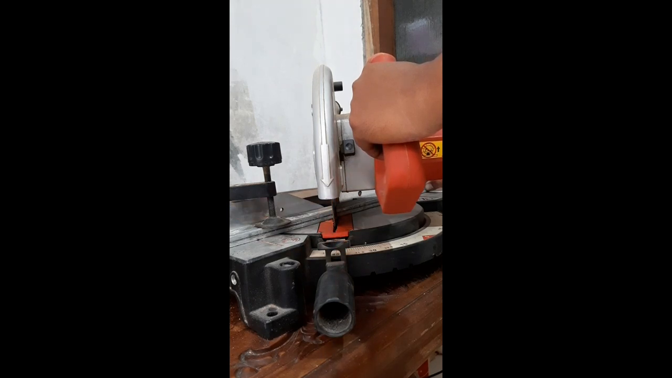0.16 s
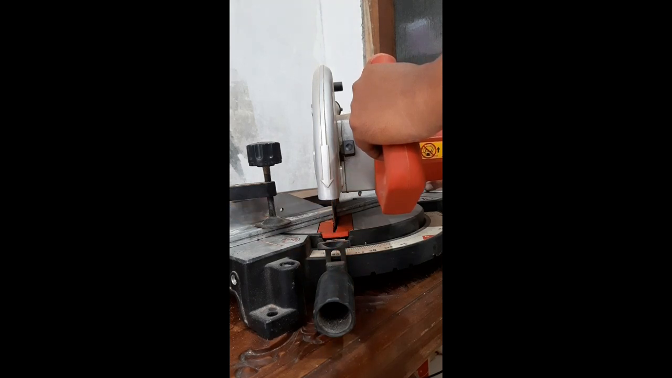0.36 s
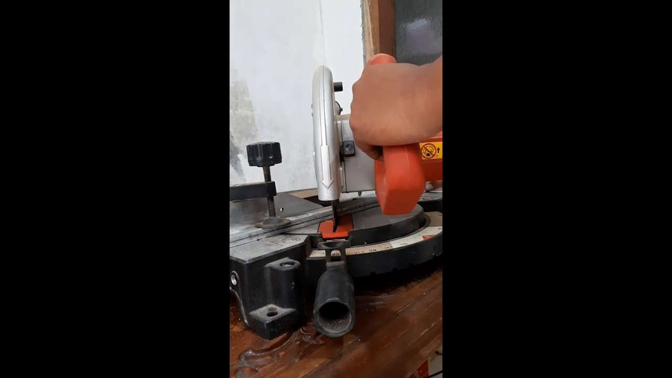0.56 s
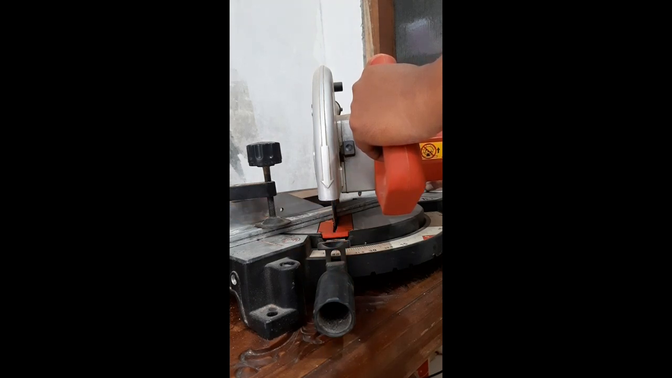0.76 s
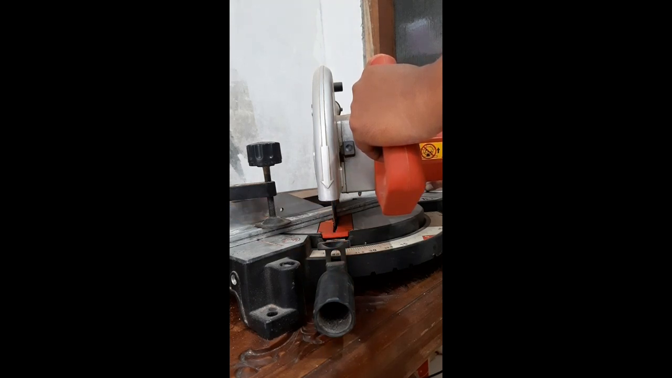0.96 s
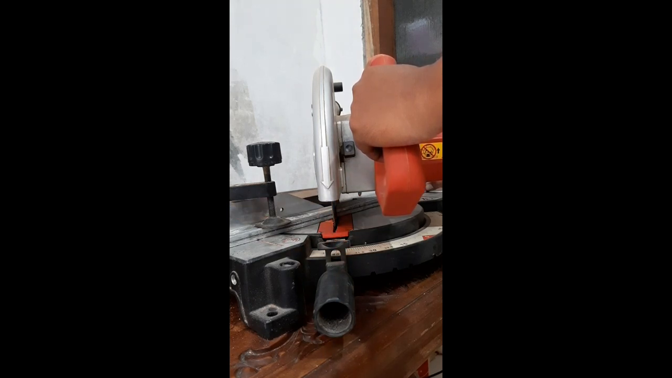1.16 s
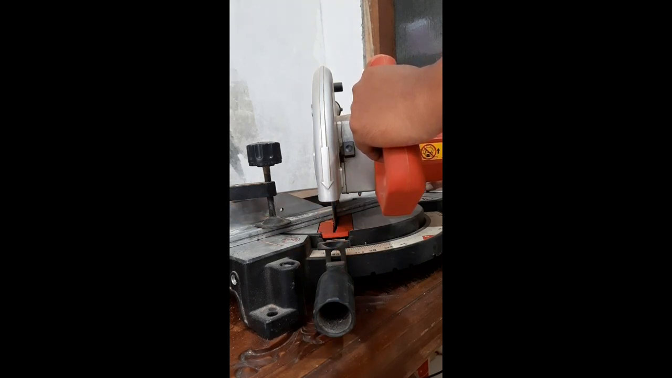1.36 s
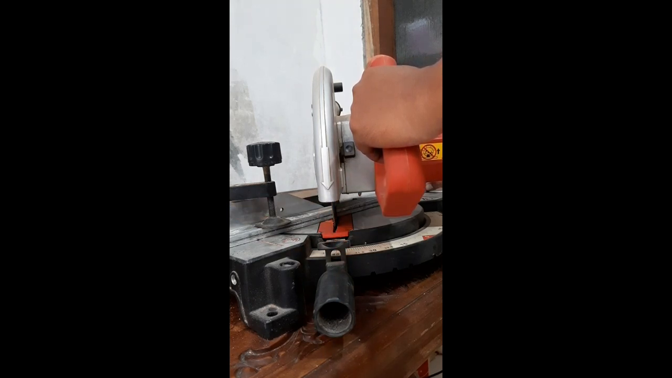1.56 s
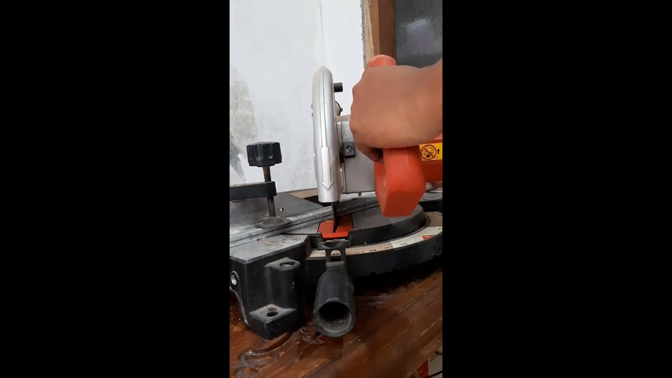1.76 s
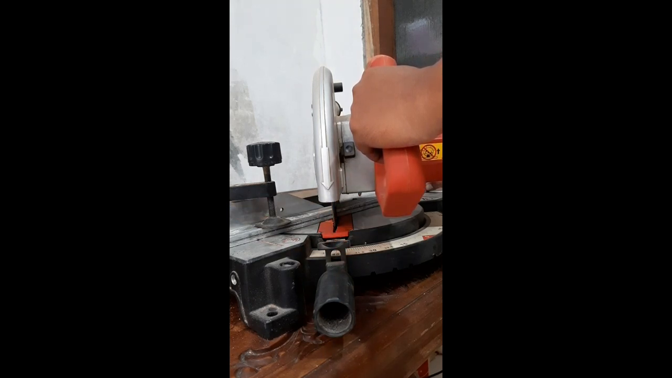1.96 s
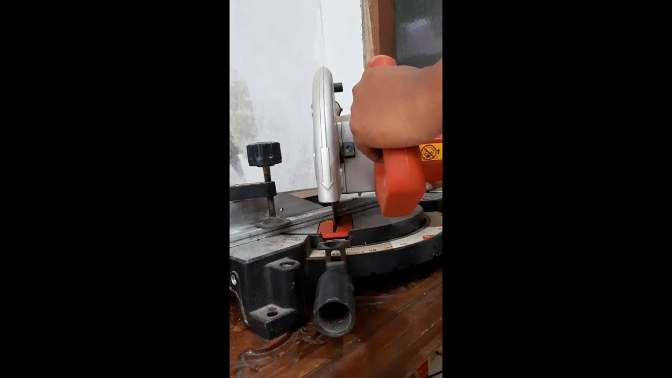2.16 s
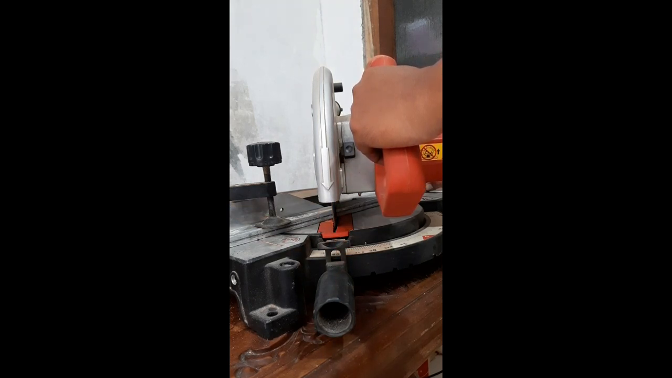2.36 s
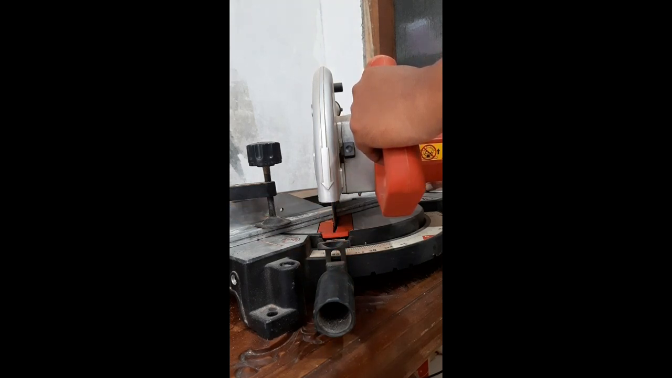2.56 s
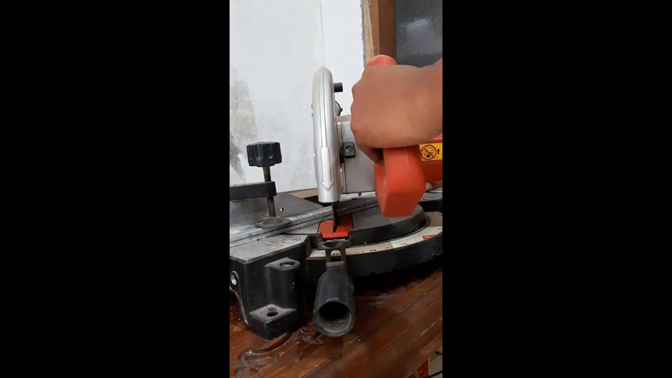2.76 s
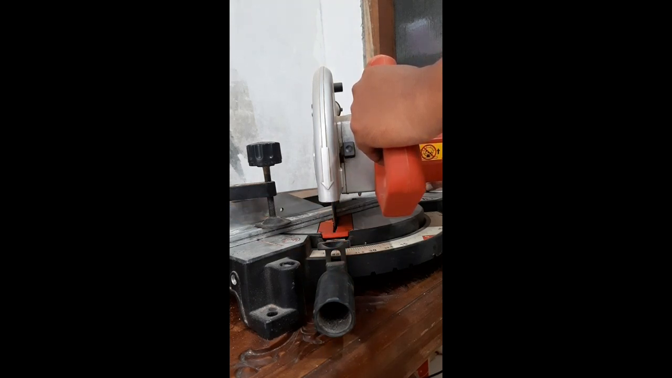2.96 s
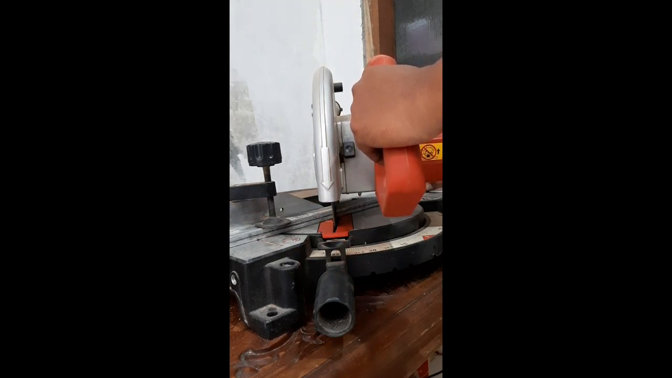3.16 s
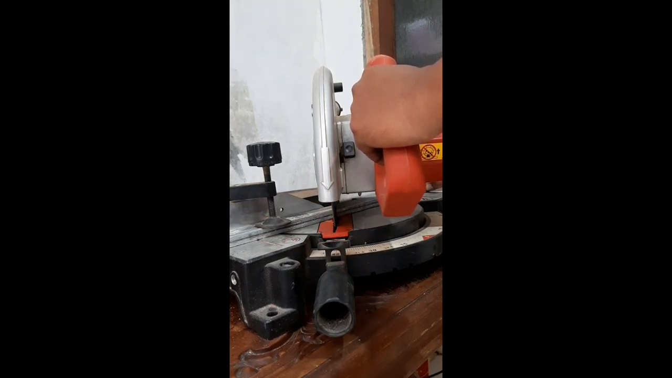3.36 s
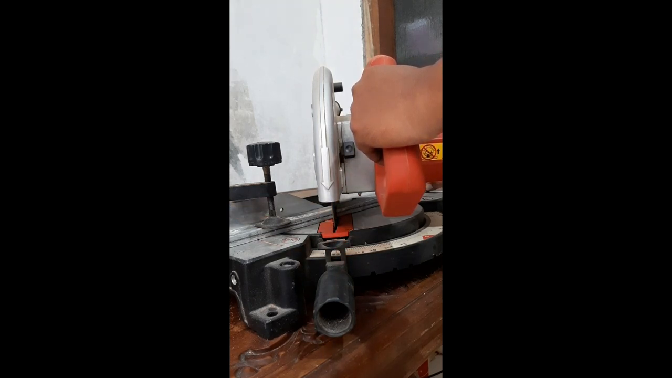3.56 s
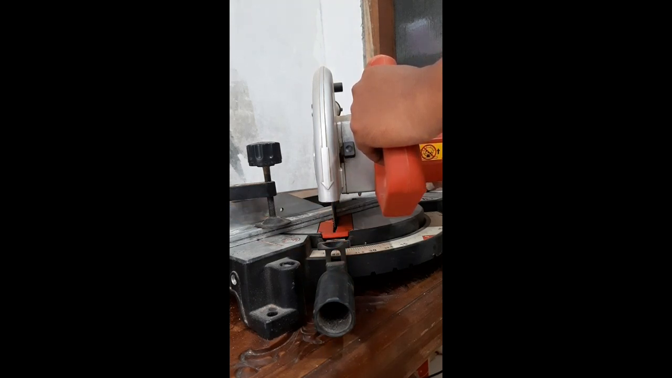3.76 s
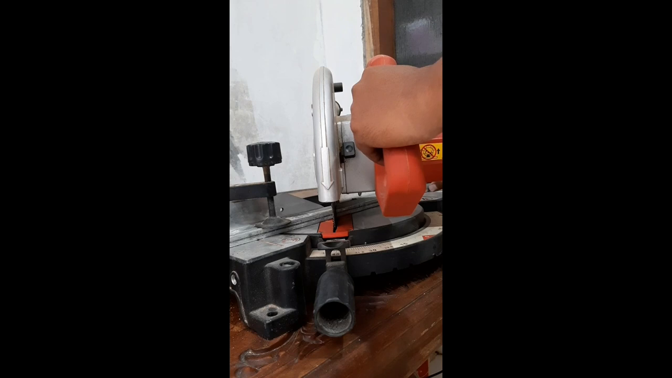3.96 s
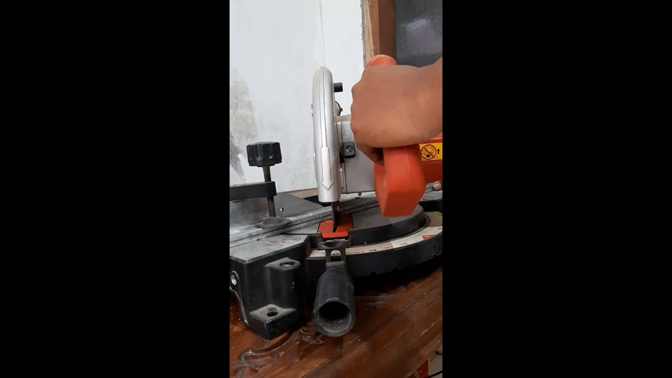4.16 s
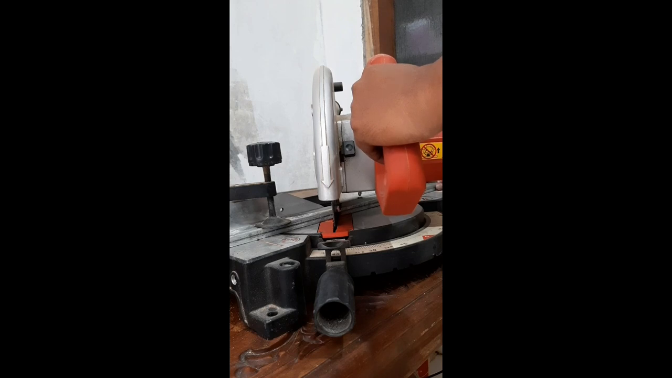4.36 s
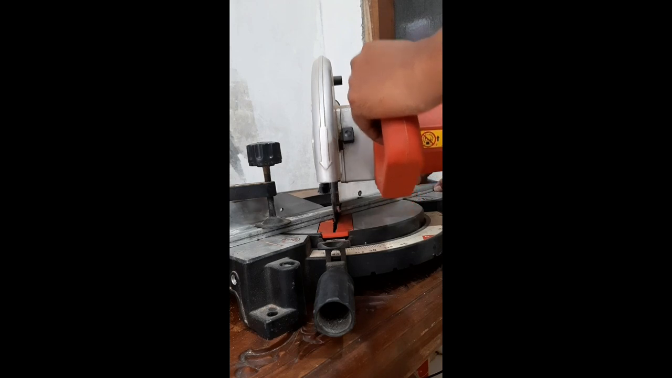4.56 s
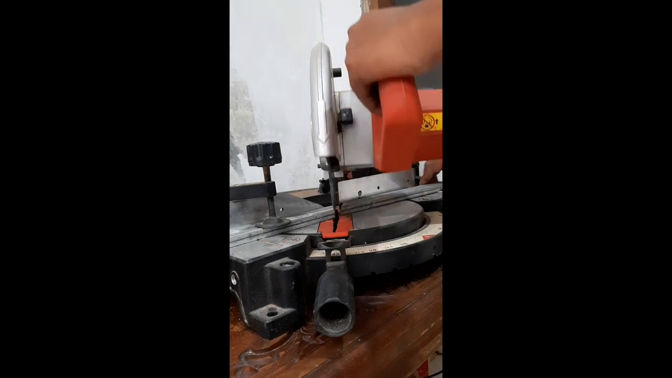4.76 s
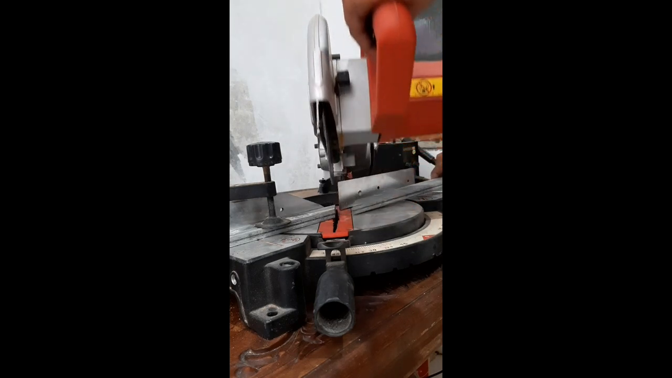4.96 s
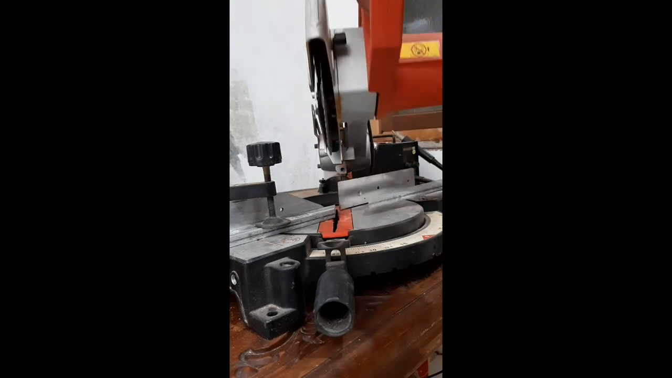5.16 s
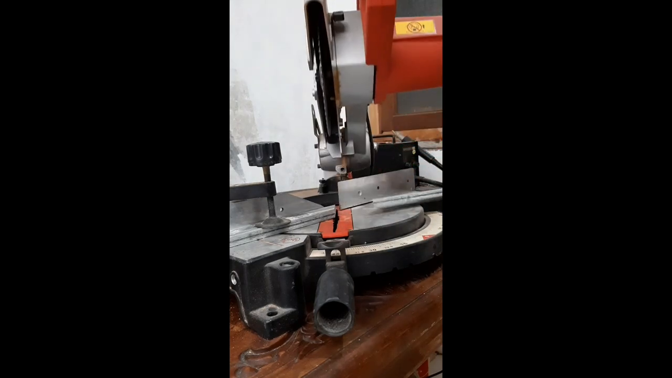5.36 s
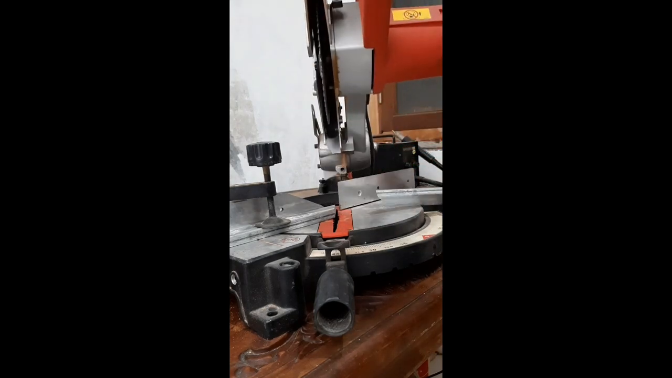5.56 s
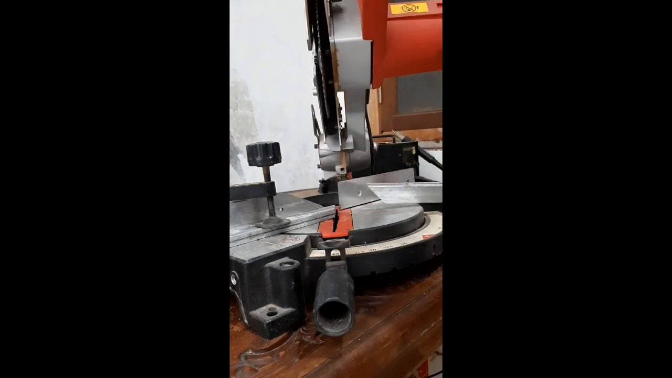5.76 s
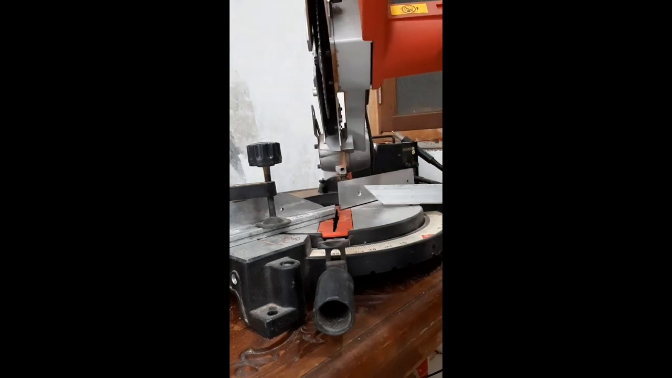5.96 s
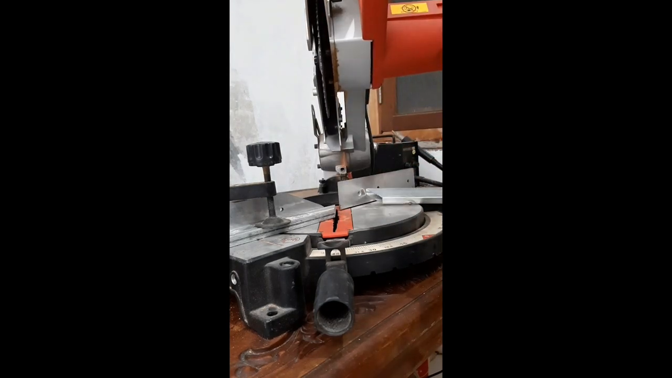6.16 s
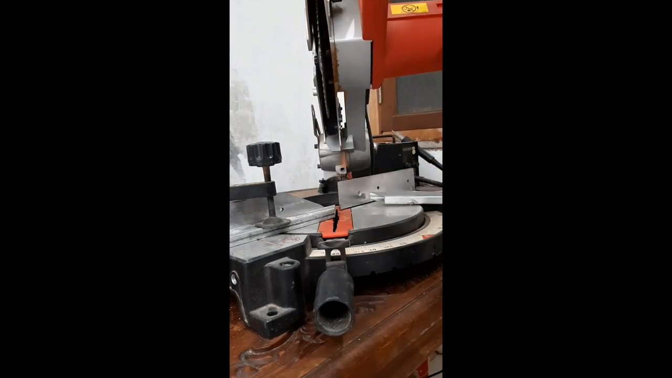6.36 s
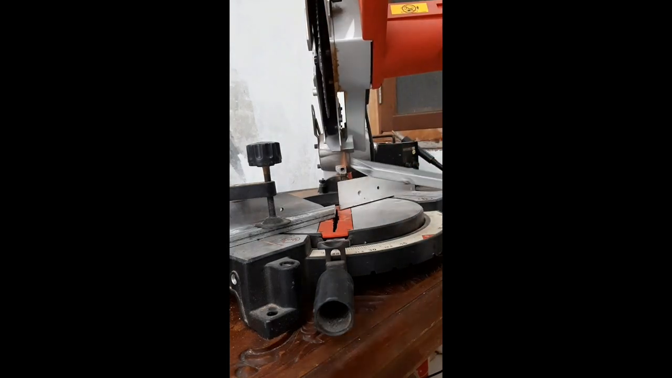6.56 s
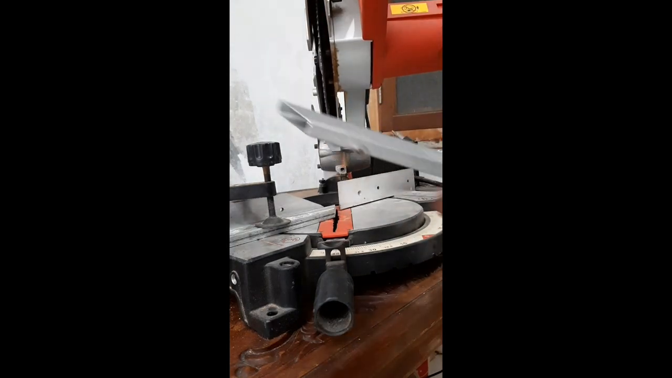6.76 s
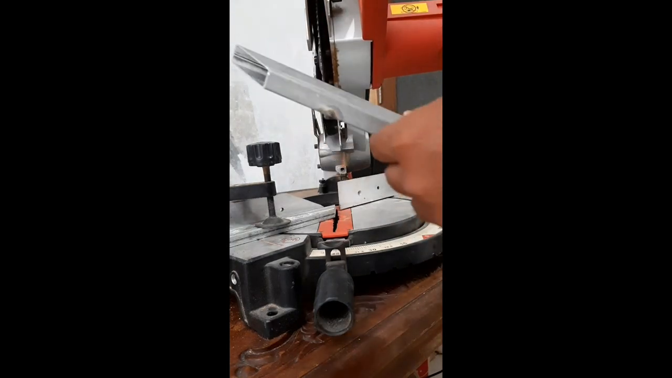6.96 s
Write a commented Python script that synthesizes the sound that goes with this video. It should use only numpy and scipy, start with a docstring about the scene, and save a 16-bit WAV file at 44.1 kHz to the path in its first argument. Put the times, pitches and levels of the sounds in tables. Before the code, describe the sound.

A miter saw grinds through steel with a harsh screech, winds down scraping and ringing, then the arm clunks up and the cut bar knocks.

```python
"""A miter saw grinds through a steel bar in a small hard room, heard from close by with a microphone pair. Chip
noise is shaped into gritty hiss and ringing steel; pings, whistles and a blade squeal are sine tones. The
slowing blade still rubs in the cut, noise ringing its free modes, until the rubbing dies and it rings out. Then
the arm is lifted against its stop, and the cut bar is knocked about and drawn off the table: blows are noise
cracks over dying modes, slides and drags are swelling noise, over a low room murmur."""
import sys
import numpy as np
from scipy import signal
from scipy.fft import rfft, irfft
from scipy.io import wavfile

SR = 44100
rng = np.random.default_rng(int(sys.argv[2]) if len(sys.argv) > 2 else 0)


def store_wav(level_fs):
    """Save 16-bit WAV to argv[1]."""
    pcm = np.round(np.clip(np.atleast_2d(level_fs), -1, 1) * 32767)
    wavfile.write(sys.argv[1], SR, pcm.T.astype(np.int16))


N = 309582
T = np.arange(N) / SR  # s
HZ = np.fft.rfftfreq(N, 1 / SR)


def amp(db):
    """Decibels to gain."""
    return 10 ** (np.asarray(db) / 20)


def unit(x):
    """Scales to rms 1."""
    return x / np.sqrt(np.mean(x ** 2) + 1e-20)


def curve(rows):
    """A two-column time table read at every sample."""
    rows = np.asarray(rows, float)
    return np.interp(T, rows[:, 0], rows[:, 1])


def read(points, hz):
    """A spectrum table read on a log-frequency axis."""
    f, value = np.transpose(points)
    return np.interp(np.log(hz + 1), np.log(f + 1), value)


def add(mix, s, sound):
    """Mixes a stereo sound in at time s."""
    part = mix[:, round(s * SR):][:, :sound.shape[1]]
    part += sound[:, :part.shape[1]]


def colour(x, gain):
    """Filters by a gain on HZ; rms 1."""
    return unit(irfft(rfft(x) * gain, N))


def wander(hz):
    """Chance drift up to about hz, in straight lines between random points; rms 1."""
    knots = np.arange(0, T[-1] + 1, .4 / hz)
    return unit(np.interp(T, knots, rng.standard_normal(N)[:len(knots)]))


def noise(size=N, shared=0.27):
    """White noise at two microphones, partly common to both."""
    z, shared = rng.standard_normal((3, size)), np.clip(shared, 0, 1)
    return np.sqrt(shared) * z[2] + np.sqrt(1 - shared) * z[:2]


def peaks(rows):
    """Power response of a set of resonances."""
    return sum(amp(db) ** 2 / (1 + ((HZ - hz) / (0.56 * width)) ** 2) ** 2 for hz, width, db in rows)


def swell(s, half):
    """A smooth bump of height 1 around time s."""
    return np.exp(-((T - s) / half) ** 2)


def stroke(start, end, attack=0.074, release=0.027):
    """Attack, hold and release of one movement, in seconds."""
    return np.clip((T - start) / attack, 0, 1) * np.exp(-np.maximum(T - end, 0) / release)


# decay of the small hard room: pitch_hz, t60_s
ROOM_DECAY = [(100, 0.7), (800, 0.85), (2000, 0.32), (5000, 0.24), (14000, 0.87)]


def room(x):
    """A diffuse tail at each microphone; every pitch range fades at its own rate."""
    hz, t, z = signal.stft(rng.standard_normal((2, SR)), SR, nperseg=256)
    fade = amp(-60 * t / read(ROOM_DECAY, hz)[:, None])
    tail = signal.istft(z * fade, SR, nperseg=256)[1]
    tail[:, :200] = 0  # the tail sets in after 4.5 ms
    return signal.fftconvolve(x, tail / np.linalg.norm(tail[0]), axes=1)[:, :N]


def reflections(x, wet_db, t60=0.044, count=120):
    """Table, guard and walls return the sound within 40 ms, combing each microphone differently."""
    taps = np.zeros((2, SR // 25))
    at = rng.integers(0, taps.shape[1], (2, count))
    strength = rng.choice([-1, 1], at.shape) * amp(-60 * at / SR / t60)
    np.put_along_axis(taps, at, strength, 1)
    taps /= np.linalg.norm(taps, axis=1, keepdims=True)
    echo = signal.oaconvolve(x, taps, axes=1)[:, :N]
    return (x + amp(wet_db) * echo) / np.sqrt(1 + amp(wet_db) ** 2)


# power off, running speed, time constant of the run-down
OFF_S, RUN_TURNS_PER_S, COAST_S = 2.55, 72, 0.57


def speed():
    """Blade speed as a share of its running speed."""
    return np.exp(-np.maximum(T - OFF_S, 0) / COAST_S)


def turning():
    """Blade angle in radians."""
    return 2 * np.pi * np.cumsum(RUN_TURNS_PER_S * speed()) / SR


FREE_S, FREE_WIDTH_S = 2.806, 0.069  # the blade comes free of the load


def free():
    """Share of the sound power that comes from the unloaded blade."""
    return .5 + .5 * np.tanh((T - FREE_S) / (2 * FREE_WIDTH_S))


# how hard the teeth bite as the hand feeds the blade: time_s, bite_db
BITE = [(0, -21), (.33, -25), (.56, -21), (.84, -22.5), (1.02, -27.5), (1.66, -25.5), (1.93, -21.5),
        (2.3, -22), (2.58, -21)]
ORDINARY_BITE_DB = -22.5


def extra_bite():
    """Bite in dB over an ordinary one."""
    return curve(BITE) - ORDINARY_BITE_DB


def grit(grain_db, chatter_db, runout_db):
    """Countless chips: uneven in size, clumped by chatter, the pressure cycling with each turn."""
    angle = turning()
    runout = np.sin(angle) + .7 * np.sin(3 * angle)
    pressure_db = grain_db * wander(1700) + chatter_db * wander(45) + runout_db * runout
    return reflections(noise(shared=0.43) * amp(pressure_db), wet_db=-9.0)


# spectrum of the grinding hiss: pitch_hz, density_db (per Hz)
GRIND_COLOUR = [(88, -63), (150, -43), (230, -23), (350, -20.5), (450, -16), (750, -11.5), (1100, -3.5),
                (2020, -6), (3200, -3), (4400, -5), (5300, -5.5), (5850, -9), (6800, -7), (7620, -9),
                (9080, -7), (14800, -9.5), (16000, -33)]
# spectrum of the shaking bench: pitch_hz, density_db (per Hz)
BENCH_COLOUR = [(25, -13.5), (60, -2), (110, 1), (210, -1.5), (400, -9.5), (1000, -66.5)]
# resonances of the bar and the loaded blade: pitch_hz, width_hz, level_db (relative)
LOADED_RESONANCES = [(1455, 40, -4), (1560, 40, -8), (2690, 25, -8), (3468, 16, -4), (3815, 24, -7),
                     (4001, 10, -4), (4275, 40, -7), (4462, 14, -5), (4628, 16, -4), (4993, 12, -3),
                     (5522, 12, -4), (6120, 18, -4), (6265, 18, -4), (7035, 40, -4), (7157, 25, -3.5),
                     (7290, 20, -9), (8000, 30, -4), (8560, 70, 1), (12257, 25, -8), (12450, 30, -5),
                     (13276, 16, -5)]
# the bench judders when the blade snags: time_s, half_length_s, level_db
BENCH_JUDDERS = [(.437, .012, -45), (0.558, .05, -56), (2.56, 0.17, -47)]
BODY_DB, BODY_FOLLOW = -23, .05  # the body hardly follows the bite (dB, dB per dB)
UNLOAD_DB_PER_S = 20  # the body drops after power off
BENCH_DB = -58  # steady shaking


def grinding():
    """The loaded blade tears at the steel; the bar rings and the bench shakes."""
    chips = grit(grain_db=1.0, chatter_db=1.31, runout_db=0.3)
    spectrum = amp(read(GRIND_COLOUR, HZ))
    treble = 1 / (1 + (4200 / (HZ + 1)) ** 4)
    bite = curve(BITE)
    unload_db = UNLOAD_DB_PER_S * np.maximum(T - OFF_S, 0)
    body_db = BODY_DB + BODY_FOLLOW * extra_bite() - unload_db
    hiss = colour(chips, spectrum * (1 - treble)) * amp(body_db)
    hiss += colour(chips, spectrum * treble) * amp(bite + 3.0)
    # as the contact shifts, groups of resonances swell and sink separately
    ring = np.zeros((2, N))
    for k in range(4):
        group = np.sqrt(peaks(LOADED_RESONANCES[k::4]))
        ring += colour(noise(shared=.25), group) * amp(2.2 * wander(9))
    jolt = amp(BENCH_DB) + sum(amp(db) * swell(s, half) for s, half, db in BENCH_JUDDERS)
    shake = colour(noise(shared=0.11), amp(read(BENCH_COLOUR, HZ))) * jolt * amp(2 * wander(15.0))
    return (hiss + ring * amp(bite - 7.5) + shake) * np.sqrt(1 - free())


PINGS_PER_S, PING_LOW_HZ, PING_HIGH_HZ = 260, 950, 5400
PING_S, PING_DB = .04, -28.5  # a ping peaks near PING_S / 2; level at an ordinary bite


def pings(spread_db=2.5, follow=0.35):
    """Chips tear off and ring briefly: a rasp of narrow, ever shifting partials."""
    out, t = np.zeros((2, N)), np.arange(0, 3 * PING_S, 1 / SR)
    shape = t / PING_S * np.exp(-2 * t / PING_S) * np.cos(np.pi / 2 * t / t[-1])
    for when, pitch, size, left, right in rng.random((round(PINGS_PER_S * FREE_S), 5)):
        hz = PING_LOW_HZ * (PING_HIGH_HZ / PING_LOW_HZ) ** pitch
        phase = np.array([[left], [left + right / 2]])  # in turns, one per microphone
        tone = np.sin(2 * np.pi * (hz * t + phase))
        add(out, when * FREE_S, amp(-spread_db * np.log(size + .05)) * shape * tone)
    level = np.sqrt(FREE_S / T[-1]) * amp(PING_DB + follow * extra_bite())
    return unit(out) * level * np.sqrt(1 - free())


# level of the singing bar before its trim: time_s, level_db
SING_LEVEL = [(0, -28), (.22, -24), (.37, -25), (.42, -42), (.52, -31), (.66, -25), (.86, -23.5),
              (1.0, -28), (1.1, -26), (1.2, -38), (1.36, -28.5), (1.7, -37), (2.3, -40)]
SING_START_HZ, SING_END_HZ, SING_SETTLE_S = 3705, 3832, .55


def singing(jitter_hz=8, flutter_db=1.3, trim_db=1.5):
    """One mode of the bar whistles on, climbing to a settled pitch as the cut deepens."""
    climb = (SING_START_HZ - SING_END_HZ) * np.exp(-T / SING_SETTLE_S)
    hz = SING_END_HZ + climb + jitter_hz * wander(90)
    turns = np.cumsum(hz) / SR + np.array([[0], [1 / 6]])
    level = amp(curve(SING_LEVEL) + trim_db + flutter_db * wander(30))
    return np.sin(2 * np.pi * turns) * level * (1 - free())


# friction makes one resonance sing: start_s, end_s, pitch_hz, level_db (before the trim)
WHISTLES = [(.0, .06, 4993, -32), (.09, .17, 4993, -30), (.05, .18, 5515, -29), (.08, .25, 7157, -31),
            (.37, .45, 4985, -31), (.38, .51, 5535, -30), (.49, .6, 4015, -31), (.49, .58, 3890, -31),
            (.56, .63, 5522, -30), (.55, .8, 7035, -30), (1.06, 1.13, 4001, -31), (1.12, 1.4, 4993, -35),
            (1.8, 1.93, 4001, -30), (1.81, 1.92, 7157, -32), (1.97, 2.04, 6275, -31),
            (2.14, 2.22, 6265, -31), (2.14, 2.3, 4001, -26), (2.33, 2.52, 4001, -29.5),
            (2.36, 2.55, 5530, -33), (2.46, 2.56, 4993, -29), (2.587, 2.613, 7200, -22),
            (3.02, 3.12, 5717, -31), (3.33, 3.41, 2835, -32)]


def screeches(jitter_hz=22, flutter_db=2, trim_db=5.0):
    """Brief unsteady whistles of steel caught by friction."""
    out, drift = np.zeros((2, N)), wander(80)
    flutter = amp(trim_db + flutter_db * wander(32))
    for start, end, hz, db in WHISTLES:
        span = slice(round(start * SR), round(end * SR))
        turns = np.cumsum(hz + jitter_hz * drift[span]) / SR + 0.2 * rng.random((2, 1))
        fade = signal.windows.tukey(turns.shape[1], .5)
        add(out, start, np.sin(2 * np.pi * turns) * amp(db) * flutter[span] * fade)
    return out + amp(-9) * room(out)


SQUEAL_DB, SQUEAL_FOLLOW = -17, 1  # before the room mix, at an ordinary bite (dB, dB per dB of bite)
SQUEAL_REST_HZ, SQUEAL_STIFFEN_HZ = 7740, 590  # spin stiffens the mode, by the square of the speed


def squeal(jitter_hz=38, burst_db=5, drift_hz=18):
    """One blade mode locks onto the friction in short bursts, louder with the bite, sinking with the speed."""
    hz = SQUEAL_REST_HZ + SQUEAL_STIFFEN_HZ * speed() ** 2
    hz += jitter_hz * wander(70) + drift_hz * wander(3.7)
    bursts = unit(amp(burst_db * np.tanh(wander(40)) * 1.5))
    level = amp(SQUEAL_DB + SQUEAL_FOLLOW * extra_bite()) * (1 - free())
    tone = np.sin(2 * np.pi * np.cumsum(hz) / SR) * bursts * level
    return 0.5 * tone + 0.5 * room(np.array([tone, tone]))


# low room murmur before its 5 dB lift: time_s, level_db
MURMUR_LEVEL = [(3.3, -75.5), (4.15, -82.5), (4.6, -75.5), (5.8, -70.5), (6.1, -65), (7.02, -63.5)]
# spectrum of the murmur: pitch_hz, density_db (per Hz)
MURMUR_COLOUR = [(25, -24.5), (60, -15), (105, 4), (190, 0), (300, -8), (700, -20), (3000, -30.5)]
# spectrum of the steady air: pitch_hz, density_db (per Hz)
AIR_COLOUR = [(300, -15), (700, -8), (1300, 0), (2500, -5), (5000, -15.5), (10000, -22.5), (15500, -14.5)]
AIR_DB = -64


def room_noise():
    """A low murmur in the room, and faint steady air: two shaped noises."""
    murmur = colour(noise(), amp(read(MURMUR_COLOUR, HZ))) * amp(curve(MURMUR_LEVEL) + 5.0)
    return murmur + colour(noise(), amp(read(AIR_COLOUR, HZ))) * amp(AIR_DB)


# rubbing of the slowing blade: time_s, level_db (before trims)
RUB_LEVEL = [(2.55, -7.5), (2.75, -20), (3.15, -26), (3.5, -37.5), (3.72, -39), (3.9, -52.5), (4.08, -65.5)]
# treble of the rubbing, dulling late in the run-down: time_s, level_db (relative)
RUB_TREBLE_LEVEL = [(2.6, 1), (3.2, 2.5), (3.7, -5.5), (4.1, -10.5)]
# spectrum of the rubbing: pitch_hz, density_db (per Hz)
RUB_COLOUR = [(88, -70.5), (150, -24.5), (420, -21.5), (550, -13.5), (680, -16.5), (820, -7.5),
              (1500, -6.5), (2550, -6.5), (2810, -5), (3160, -10.5), (5250, -9), (6200, -20), (7180, -27.5),
              (7800, -16), (8560, -24.5), (11000, -10.5), (14000, -18.5), (16000, -30.5)]
# the wobbling blade catches the side of the cut: time_s, half_length_s, extra_db
SIDE_CATCHES = [(2.847, 0.014, 3), (2.968, 0.015, 2), (3.054, 0.01, 0), (3.154, 0.0098, -3),
                (3.194, 0.015, 2.5), (3.238, 0.017, 2.5), (3.395, 0.074, 7.5), (3.611, 0.066, 8),
                (3.878, 0.027, 2.5)]
# resonances of the free, turning blade: pitch_hz, width_hz, level_db (relative)
FREE_RESONANCES = [(1095, 80, 2.5), (1460, 60, 7), (1555, 80, 10.5), (1852, 50, 12), (2116, 40, 9),
                   (2304, 60, 10), (2825, 55, 11), (2910, 130, 7), (3400, 150, 2), (3720, 130, 7.5),
                   (3980, 140, 6), (4580, 170, 7), (4755, 90, 12), (5310, 90, 11), (5520, 80, 8),
                   (5717, 25, 11), (5975, 80, 10), (6660, 180, 12), (7020, 110, 16), (7590, 100, 10),
                   (7785, 120, 15.5), (7930, 80, 9), (8096, 40, 11), (8199, 40, 10), (8800, 200, 7),
                   (9330, 200, 7)]
# the blade at rest: pitch_hz, level_db (before REST_DB), t60_s
REST_RING = [(1104, -77, 2.2), (1857, -70, 1.5), (2288, -76, 1), (2627, -65, 2.2), (3666, -72, 1.6),
             (4657, -79, 1.2), (5071, -80, 2), (5647, -79, 1)]
RUB_STOP_DB_PER_S = 91  # dying away after the last contact
REST_S, REST_DB, REST_RISE_DB_PER_S = 3.93, 4, 78  # the free ring: time of its peak, lift, rise


def coasting(swell_db=4.5):
    """The slowing blade scrapes the side of the cut, ringing its free modes in turn, then rings out."""
    chips = grit(grain_db=1.5, chatter_db=0.95, runout_db=-0.17)
    treble = 1 / (1 + (6500 / (HZ + 1)) ** 8)
    spectrum = rfft(chips) * amp(read(RUB_COLOUR, HZ))
    scrape = .55 * irfft(spectrum, N)
    for k in range(3):
        group = np.sqrt(peaks(FREE_RESONANCES[k::3]))
        scrape += irfft(spectrum * group, N) * amp(swell_db * np.tanh(wander(17)))
    contact_db = curve(RUB_LEVEL) + sum(db * swell(s, half) for s, half, db in SIDE_CATCHES)
    contact_db -= RUB_STOP_DB_PER_S * np.maximum(T - RUB_LEVEL[-1][0], 0)
    rub = colour(scrape, 1 - treble) * amp(1.5)
    rub += colour(scrape, treble) * amp(curve(RUB_TREBLE_LEVEL))
    ring = np.zeros((2, N))
    for hz, db, t60 in REST_RING:
        level = amp(db + 2 * wander(30) - 60 * np.maximum(T - REST_S, 0) / t60)
        ring += level * np.sin(2 * np.pi * (hz * T + rng.random((2, 1)) / np.pi))
    rise = amp(REST_DB + REST_RISE_DB_PER_S * np.minimum(T - REST_S, 0))
    return rub * amp(contact_db) * np.sqrt(free()) + ring * rise


def ringing(modes, t, scatter=.4, flutter_hz=28):
    """Dying modes, each beating with a close partner and wavering differently at each microphone."""
    out, knots = np.zeros((2, len(t))), np.arange(0, t[-1] + 1, 1 / flutter_hz)
    for hz, db, t60 in modes:
        turn = np.exp(2j * np.pi * (hz * t + rng.random())) * amp(db - 60 * t / t60)
        turn *= .9 + .4 * np.exp(2j * np.pi * flutter_hz * rng.uniform(.4, 1.4) * t)  # the partner
        for side in out:
            z = rng.standard_normal((2, 200))[:, :len(knots)]
            echo = np.interp(t, knots, z[0] + 1j * z[1])
            side += (turn * (0.81 * np.exp(2j * rng.random()) + scatter * echo)).imag
    return out


# modes of the saw's frame: pitch_hz, level_db (relative), t60_s
FRAME = [(572, -14, 0.34), (785, -13, 0.26), (1130, 6, 0.079), (1266, -7, 0.24), (1327, 8, 0.059)]


def blows(rows, spectrum, modes, frame_db, attack_s, wet_db):
    """Each blow cracks, rattles the saw's frame and rings the struck steel; the room answers the rattle."""
    out, t = np.zeros((2, N)), np.arange(SR) / SR
    shape = amp(read(spectrum, np.fft.rfftfreq(SR, 1 / SR)))
    steel, frame = ringing(modes, t), ringing(FRAME, t)
    for s, db, t60, ring_db in rows:
        crack = unit(irfft(rfft(noise(size=SR, shared=0.84)) * shape, SR)) * amp(2.0 - 60 * t / t60)
        rattle = crack + amp(frame_db) * frame
        blow = rattle + amp(wet_db) * room(rattle)[:, :SR] + amp(ring_db) * steel
        add(out, s, amp(db) * blow * (1 - np.exp(-t / attack_s)))
    return out


# arm and guard clunk as they are lifted: time_s, level_db, t60_s, guard_ring_db (against the blow)
ARM_CLUNKS = [(4.267, -54.5, 0.17, -41), (4.3, -53.5, 0.11, -44), (4.32, -48, 0.17, -30),
              (4.341, -52, 0.24, -24), (4.736, -42, .04, -30), (4.742, -43.5, 0.033, -28.5),
              (4.767, -58.5, 0.068, -24.5), (4.838, -48.5, .04, -18), (4.851, -56, .05, -21),
              (4.926, -49.5, 0.019, -6.5), (5.01, -60, 0.087, -3), (5.087, -51.5, 0.041, -4)]
# spectrum of a clunk: pitch_hz, density_db (per Hz)
ARM_COLOUR = [(40, -23), (200, -31), (450, 9.5), (1200, 16.5), (3600, -4), (9000, -13), (15000, -27)]
# the loose guard rattles: pitch_hz, level_db (relative), t60_s
GUARD = [(2930, 0.5, 0.23), (3330, -8.5, 0.23), (4100, -0.5, 0.24), (4450, -5, .22), (4830, -6, 0.29)]


def clunks():
    """The arm clunks on its way up and rings the loose guard."""
    return blows(ARM_CLUNKS, ARM_COLOUR, GUARD, frame_db=-2.5, attack_s=0.002, wet_db=-4.5)


# guard and arm slide: start_s, end_s, body_db, hiss_db (before trims)
GUARD_SLIDES = [(4.3, 4.408, -59, -60.5), (4.408, 4.84, -65.5, -71), (4.776, 5.093, -60.5, -61.5),
                (5.044, 5.475, -63, -56.5), (5.482, 6.052, -58.5, -65)]
# spectrum of the slide's body: pitch_hz, density_db (per Hz)
SLIDE_BODY_COLOUR = [(200, -26), (450, -8), (800, -13), (1250, 9.5), (2200, 3), (4500, -4), (8000, -35)]
# spectrum of the slide's hiss: pitch_hz, density_db (per Hz)
SLIDE_HISS_COLOUR = [(600, -23), (2000, 7), (4500, 5), (7500, 4.5), (11000, 0.5), (15500, -4)]


def sliding():
    """The guard slides back as the arm rises: an uneven body and a steadier hiss of noise."""
    body_move = sum(amp(db) * stroke(start, end) for start, end, db, _ in GUARD_SLIDES)
    hiss_move = sum(amp(db) * stroke(start, end) for start, end, _, db in GUARD_SLIDES)
    body = colour(noise(), amp(read(SLIDE_BODY_COLOUR, HZ))) * body_move
    hiss = colour(noise(), amp(read(SLIDE_HISS_COLOUR, HZ))) * hiss_move
    return body * amp(-0.5 + 4.5 * np.tanh(wander(27))) + hiss * amp(-2.5 + 1.0 * wander(60))


# the arm hits its upper stop and rebounds: time_s, level_db, t60_s, blade_ring_db (against the blow)
STOP_HITS = [(5.506, -19.5, 0.072, -4), (5.519, -20, 0.023, -42)]
# spectrum of the hit: pitch_hz, density_db (per Hz)
STOP_HIT_COLOUR = [(40, -43), (200, -38), (450, -12), (800, -5.5), (1200, 6), (1700, 3.5), (2400, 2),
                   (3300, 17), (4200, 8), (9000, -3), (15000, -17)]
# modes of the struck blade: pitch_hz, level_db (relative), t60_s
STRUCK_BLADE = [(2853, -7, .68), (3100, -8, .36), (3350, -4.5, .38), (3773, -2, .58), (4457, -6, .4),
                (4778, -7, .48), (5130, -3, .36), (5455, -13, .25), (5733, -11, .3), (6090, -12, .25),
                (6540, -11, .2), (7461, -14, .36), (7765, -7, .27), (8345, -19, .36)]


def stop_hits():
    """The arm hits its upper stop, which rings the blade."""
    return blows(STOP_HITS, STOP_HIT_COLOUR, STRUCK_BLADE, frame_db=-19.0, attack_s=0.00054, wet_db=-2.5)


# modes of the cut bar lying against the saw: pitch_hz, level_db (relative), t60_s
CUT_BAR = [(732, -7, .6), (808, -4, .6), (1030, -1, .55), (1128, -3, .45), (1190, -4, .5), (1362, -2, .5),
           (1540, -6, .35), (1811, -6, .45), (2095, -9, .36), (2250, -8, .36), (2420, -8, .4),
           (2853, -10, .5), (3100, -4, .35), (3284, 0, .52), (3375, -1, .44), (3542, -5, .28),
           (3765, -6, .4), (4253, -8, .35), (4657, -8, .35), (4785, -7, .45), (6013, -19, .45),
           (7465, -21, .4), (7775, -18, .4)]
FAVOUR_DB, FAVOUR_HZ = 14.5, 130  # extra ring of the modes near the favoured pitch, and its reach


def bar_modes(favoured_hz):
    """The point of contact brings out some of the bar's modes."""
    modes = []
    for hz, db, t60 in CUT_BAR:
        favour = np.exp(-((hz - favoured_hz) / FAVOUR_HZ) ** 2)
        modes.append((hz, db + FAVOUR_DB * favour, t60))
    return modes


# the cut bar knocks on the table: time_s, level_db, t60_s, bar_ring_db (against the blow), favoured_hz
BAR_KNOCKS = [(6.009, -21, 0.055, -17.5, 2220), (6.02, -31, 0.081, -19, 1190),
              (6.051, -38, 0.12, -15.5, 3360), (6.094, -33.5, 0.038, -29, 1200),
              (6.139, -46, .1, -14, 1180), (6.322, -53, .04, -27, 1030), (6.399, -46, .11, -14, 2860),
              (6.411, -18.5, 0.089, -12, 2855), (6.426, -30, .06, -21, 1030), (6.444, -38, .034, -27, 3540)]
# spectrum of a knock: pitch_hz, density_db (per Hz)
BAR_KNOCK_COLOUR = [(40, -28), (200, -19), (450, -6), (600, -12), (1150, 6.5), (1900, 2), (2280, 5),
                    (2650, -9), (3700, -3), (4500, -4), (5400, -16), (9000, -26), (15000, -43)]


def bar_knocks():
    """The cut bar is knocked about, each contact ringing it differently."""
    out = np.zeros((2, N))
    for *row, hz in BAR_KNOCKS:
        out += blows([row], BAR_KNOCK_COLOUR, bar_modes(hz), frame_db=-14.0, attack_s=0.00055, wet_db=-1.5)
    return out


# the bar is dragged over the table: start_s, end_s, level_db
BAR_DRAGS = [(6.013, 6.247, -48.5), (6.264, 6.634, -48), (6.624, 7.02, -56.5)]
# spectrum of the drag: pitch_hz, density_db (per Hz)
BAR_DRAG_COLOUR = [(200, -4.5), (500, 0), (800, 11.5), (1250, -0.5), (2200, 0), (4500, -8.5), (8000, -19),
                   (15000, -24)]
# the bar's edge scrapes as it is picked up: start_s, end_s, level_db
EDGE_SCRAPES = [(6.875, 6.907, -52.5), (6.953, 7.02, -47), (6.985, 6.999, -48)]
# spectrum of the scrape: pitch_hz, density_db (per Hz)
EDGE_COLOUR = [(180, -27), (300, 0), (634, -25), (900, -3), (1140, -26), (1230, -3), (3400, -2),
               (14000, -14.5), (16000, -23)]
# the dragged bar chatters: level against the drag, swing, width of its modes
RATTLE_DB, RATTLE_SWING_DB, RATTLE_WIDTH_HZ = -11, 11, 45


def dragging():
    """The bar is drawn over the table, and its edge scrapes as it leaves."""
    pull = sum(amp(db) * stroke(start, end) for start, end, db in BAR_DRAGS)
    edge = sum(amp(db) * stroke(start, end, 0.016, 0.027) for start, end, db in EDGE_SCRAPES)
    drag = colour(noise(), amp(read(BAR_DRAG_COLOUR, HZ))) * pull * amp(7.3 * np.tanh(wander(28)))
    # stick and slip rattle the bar's nine lowest modes, each group in its own rhythm
    for k in range(3):
        modes = peaks([(hz, RATTLE_WIDTH_HZ, db) for hz, db, _ in CUT_BAR[k:9:3]])
        chatter = amp(RATTLE_DB + RATTLE_SWING_DB * np.tanh(wander(30)))
        drag += colour(noise(), np.sqrt(modes)) * pull * chatter
    return drag + colour(noise(), amp(read(EDGE_COLOUR, HZ))) * edge * amp(2.1 * wander(213))


def scene():
    """The cut, the run-down and the handling afterwards."""
    cut = grinding() + pings() + singing() + screeches() + squeal()
    handling = clunks() + sliding() + stop_hits() + bar_knocks() + dragging()
    return cut + room_noise() + coasting() + handling


# width at the two microphones: pitch_hz, gain_db (of their difference)
STEREO_WIDTH = [(50, -5), (130, -4), (300, -5.5), (600, -2.5), (1100, -1), (2200, 0.5), (4500, 3),
                (8000, 0), (12000, 3.5)]
EDGE_HZ = 15600  # upper band limit


def record(dry):
    """The microphone pair's width, then the recorder's band limit."""
    mid, side = (dry[0] + dry[1]) / 2, (dry[0] - dry[1]) / 2
    width = amp(read(STEREO_WIDTH, np.fft.rfftfreq(2 * N, 1 / SR)))
    side = irfft(rfft(side, 2 * N) * width, 2 * N)[:N]
    lowpass = signal.firwin(511, EDGE_HZ, window=("kaiser", 9), fs=SR)
    return signal.oaconvolve(np.array([mid + side, mid - side]), lowpass[None], "same")


dry = scene()
out = record(dry)
store_wav(out)
```